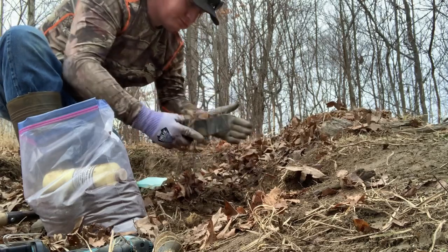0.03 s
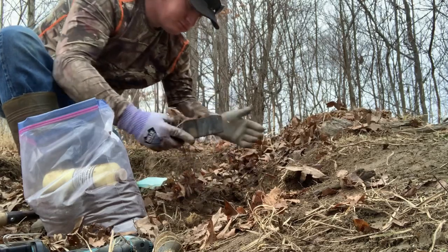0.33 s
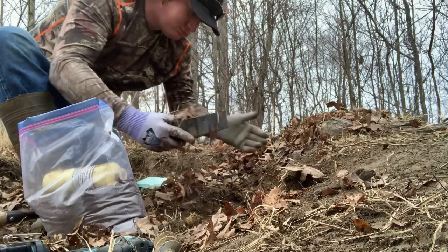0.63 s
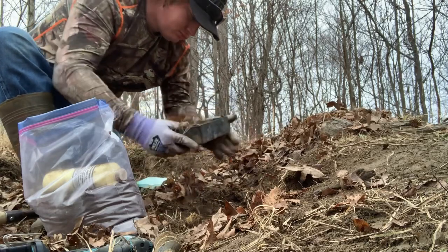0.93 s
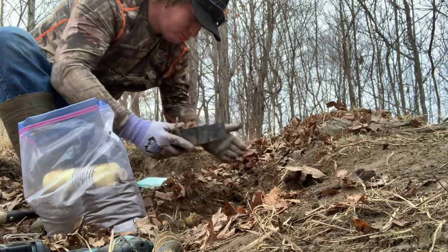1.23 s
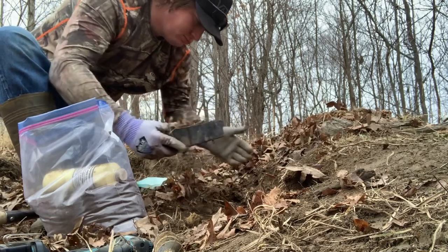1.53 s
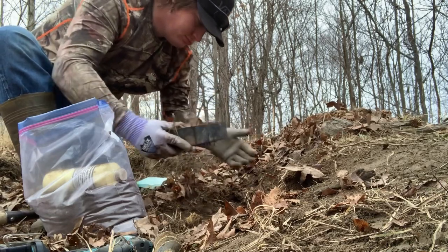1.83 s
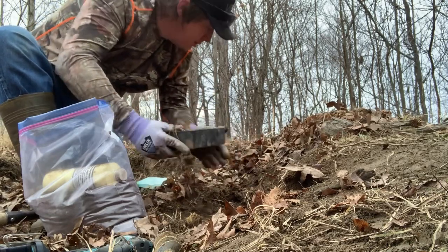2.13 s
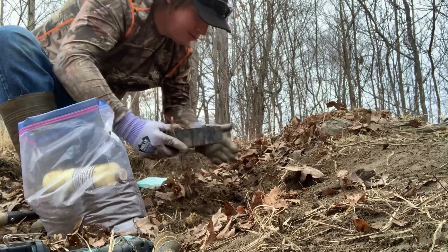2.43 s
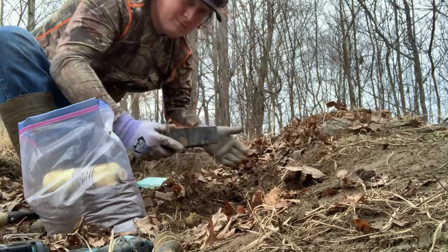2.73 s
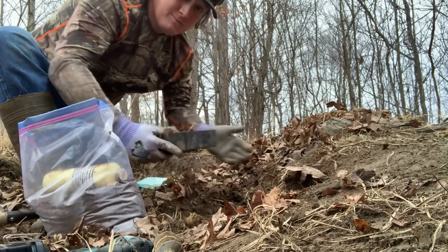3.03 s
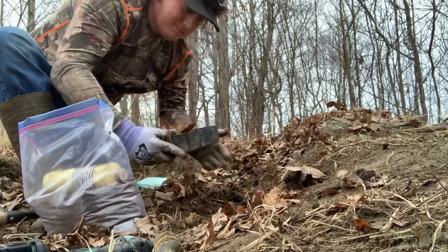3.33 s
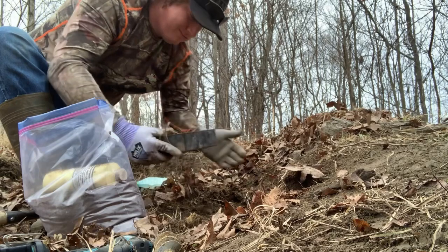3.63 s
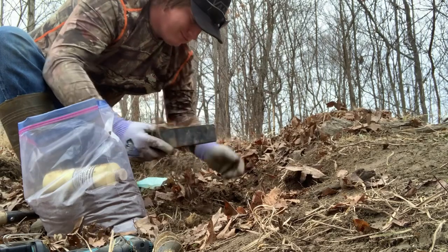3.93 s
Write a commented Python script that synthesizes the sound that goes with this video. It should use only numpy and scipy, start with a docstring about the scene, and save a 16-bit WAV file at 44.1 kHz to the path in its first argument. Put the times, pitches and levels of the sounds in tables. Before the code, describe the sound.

Dry, steady knife taps on a hand-held dirt clod, over a faint distant engine.

```python
"""A digging knife knocks on a hand-held clod about four times a second; a gloved person kneels in a wood.
Each knock: a dry crack, a second contact a few ms later, a dull handle knock and a sinking thud;
the blade sometimes rings on. Sleeves swish with every stroke, gloves scuff, crumbs drop on leaves.
An engine drones far away under faint wind."""
import sys
import numpy as np
from scipy import signal
from scipy.fft import rfft, irfft
from scipy.io import wavfile

SR = 44100
rng = np.random.default_rng(int(sys.argv[2]) if len(sys.argv) > 2 else 0)


def waveform_to_disk(signal):
    """Save audio, clipped to [-1, 1], as 16-bit WAV at the path in sys.argv[1]."""
    frames = np.transpose(np.atleast_2d(signal))
    scaled = np.clip(frames, -1, 1) * 32767
    samples = np.round(scaled).astype(np.int16)
    wavfile.write(sys.argv[1], SR, samples)


N = 176400
TIME_S = np.arange(N) / SR
HIT_S = TIME_S[:N // 16]

# Knife blows: (time [s], crack [dB], crack pitch [Hz], low-mid re crack [dB], top re crack [dB],
# second contact delay [s], second contact [dB], handle [dB], thud [dB], ring [dB], sleeve [dB])
BLOWS = [(0.1633, -24.5, 3030, -4.5, -2.5, 0.012, -40, -30.5, -24.5, -52.5, -52.5),
         (0.4155, -22, 2970, 1, -2, 0.0042, -28, -34, -25, -36.5, -49),
         (0.6683, -25, 2840, -3.5, -5, 0.0035, -25.5, -34.5, -23, -42, -48),
         (0.9018, -27.5, 3150, 1.5, -1, 0.0035, -24.5, -32.5, -24.5, -47, -50),
         (1.125, -23.5, 3170, -4.5, -4, 0.0047, -29, -35, -22.5, -45, -51),
         (1.3779, -23, 3120, -5, -7.5, 0.0042, -24, -30.5, -22, -42.5, -48.5),
         (1.6299, -22, 2760, -3, -10, 0.0033, -20.5, -32.5, -23.5, -36.5, -47.5),
         (1.8645, -22, 3640, -6, -9.5, 0.0047, -23, -33.5, -24.5, -51.5, -49.5),
         (2.0994, -31, 3180, -3.5, -7.5, 0.0036, -34.5, -39.5, -30.5, -55, -52),
         (2.3298, -22.5, 3380, -5, -5, 0.0045, -24, -25.5, -24, -56, -51.5),
         (2.56, -21.5, 3460, -6, -3.5, 0.0033, -20, -28.5, -19, -47.5, -49),
         (2.7823, -22, 3150, -6, -5.5, 0.0037, -23, -27, -23.5, -49.5, -51.5),
         (3.0183, -22, 3370, -3, -2.5, 0.0033, -21.5, -36, -24, -49.5, -50),
         (3.2522, -23.5, 3440, -8.5, -4, 0.0035, -22, -29, -19, -39.5, -49),
         (3.4703, -16.5, 3115, -10.5, -7.5, 0.0039, -21.5, -26, -23, -47, -51),
         (3.7056, -25, 3410, -14, -2, 0.0036, -20, -32, -21.5, -44.5, -51.5)]


def from_db(db):
    """Decibels to gain."""
    return 10 ** (np.asarray(db) / 20)


def add(out, start_s, sound):
    """Mix a sound into out."""
    i = max(int(start_s * SR), 0)
    out[i:i + len(sound)] += sound[:max(N - i, 0)]


def drift(rate_hz):
    """Interpolated random values, spread about 1."""
    return np.interp(TIME_S * rate_hz, np.arange(N), rng.standard_normal(N))


def coloured_noise(spectrum):
    """Unit-rms noise shaped by (frequency [Hz], density [dB])."""
    hz, db = np.transpose(spectrum)
    bins_hz = np.maximum(np.fft.rfftfreq(N, 1 / SR), 1)
    gain = from_db(np.interp(np.log(bins_hz), np.log(hz), db))
    noise = irfft(rfft(rng.standard_normal(N)) * gain, N)
    return noise / np.sqrt(np.mean(noise ** 2) + 1e-20)


def resonate(x, modes):
    """Parallel damped resonances, alternating in sign."""
    out = np.zeros(len(x))
    for k, (hz, width_hz, db) in enumerate(modes):
        r = np.exp(-np.pi * width_hz / SR)
        b = np.array([1, 0, -1]) * (1 - r * r) / 2
        a = [1, -2 * r * np.cos(2 * np.pi * hz / SR), r * r]
        out += (-1) ** k * from_db(db) * signal.lfilter(b, a, x + 1e-18)
    return out


def friction(attack_s, decay_s):
    """Burst of tiny contacts that swells and dies."""
    envelope = np.minimum(HIT_S / attack_s, 1) * np.exp(-np.maximum(HIT_S - attack_s, 0) / decay_s)
    return envelope * rng.standard_normal(len(HIT_S))


def at_level(x, db):
    """Scale to the energy of 4 ms at this level."""
    return from_db(db) * x / np.sqrt(np.sum(x ** 2) / (.004 * SR) + 1e-20)


def touches(events, modes, attack_s, decay_s, gain_db):
    """One friction burst through the modes per event."""
    out = np.zeros(N)
    for start_s, db in events:
        burst = resonate(friction(attack_s, decay_s), modes)
        add(out, start_s, at_level(burst, db + gain_db))
    return out


def engine():
    """Low orders of a distant engine, wavering on the way; a second hum beats with them."""
    # Harmonics of the turning rate: (order, level [dB])
    orders = [(2, -40), (3, -50), (4, -49), (6, -53.5), (8, -55), (10, -63.5)]
    # Drone envelope: (time [s], gain [dB])
    swell = [(0, -2.5), (.5, -1.5), (1.15, -1), (1.3, 1), (1.5, -3.5), (1.7, -1), (2.0, -3), (2.15, -4.5),
             (2.38, -5.5), (2.6, -1), (3.0, -1), (3.5, -3.5), (4, -1.5)]
    # Second hum envelope: (time [s], level [dB])
    hum_levels = [(0, -48), (.5, -55), (.9, -56), (1.1, -74), (4, -65)]
    turn_hz, hum_hz, wander, flutter_db = 33.62, 78.9, .004, .9
    clock_s = np.cumsum(1 + wander * drift(5.37)) / SR
    drone = sum(from_db(db + flutter_db * drift(7.2)) * np.sin(2 * np.pi * order * turn_hz * clock_s)
                for order, db in orders)
    drone *= from_db(np.interp(TIME_S, *np.transpose(swell)))
    hum_gain = from_db(np.interp(TIME_S, *np.transpose(hum_levels)))
    hum = hum_gain * np.sin(2 * np.pi * hum_hz * clock_s)
    return np.sqrt(2) * (drone + hum)


def wind():
    """Faint low noise with slight gusts."""
    # Wind spectrum: (frequency [Hz], relative density [dB])
    spectrum = [(25, -0.5), (45, 1.5), (100, 8.5), (200, -4.5), (300, -6), (480, -7.5), (750, -17.5),
                (1000, -16.5), (1500, -28.5), (2100, -27.5), (3200, -26), (5500, -32), (7500, -29.5),
                (11000, -36.5), (15500, -44)]
    level_db, gust_db = -51.5, 2.05
    return from_db(level_db - gust_db * drift(3.95)) * coloured_noise(spectrum)


def sleeves():
    """Cloth rubs, grainy and uneven, as the arm swings down and lifts."""
    # Swing, then lift: (offset from knock [s], width [s], gain [dB])
    lobes = [(-.022, 0.037, 1.5), (0.068, 0.046, -3.5)]
    # Cloth spectrum: (frequency [Hz], relative density [dB])
    spectrum = [(300, 4.5), (500, -1.5), (750, 0), (1000, -8.5), (1400, -7), (2000, -7.5), (2700, -1.5),
                (3400, -0.5), (4500, -9), (5800, -7.5), (7000, -6.5), (9000, -11), (12000, -16.5),
                (15500, -28.5)]
    gain_db, grain_db, patch_db = -.5, 2.5, 1.5
    moves = [(knock_s + offset_s, width_s, sleeve_db + db)
             for knock_s, *_, sleeve_db in BLOWS for offset_s, width_s, db in lobes]
    moves.append((3.98, .12, -61.5))  # hands settle after the last knock
    power = sum(from_db(db) ** 2 * np.exp(-np.minimum(((TIME_S - centre_s) / width_s) ** 2, 20))
                for centre_s, width_s, db in moves)
    texture_db = grain_db * drift(1800) + patch_db * drift(60)
    return np.sqrt(power) * from_db(gain_db + texture_db) * coloured_noise(spectrum)


def crack(db, pitch_hz, low_mid_db, top_db, decay_s):
    """A click and crushed grit excite low-mid, middle and top modes, each group at its own level."""
    # Damped crack modes: (frequency [Hz], width [Hz], gain [dB])
    crack_modes = [(1210, 216, 2), (1490, 137, 5.5), (1720, 530, -2.5), (2277, 215, -2.5), (2787, 416, -1),
                   (3307, 566, 6), (3750, 950, 0), (5170, 1500, -9), (7150, 1600, 13.5), (7760, 470, -22.5),
                   (8410, 1980, -4), (11200, 600, -17), (12400, 1000, -15)]
    attack_s, tail_db, tail_decay_s = .00081, -19.5, .0098
    click_s, click_db, contact_hz = .0007, 9.5, 10600
    force = friction(attack_s, decay_s) + from_db(tail_db) * friction(attack_s, tail_decay_s)
    force[int(click_s * SR)] += from_db(click_db)
    force = signal.sosfilt(signal.butter(2, contact_hz, fs=SR, output="sos"), force)  # soft contact
    modes = crack_modes + [(pitch_hz, 286, 3)]  # pitch depends on where the blade lands
    groups = np.digitize([hz for hz, *_ in modes], [2200, 6000])
    out = np.zeros(len(HIT_S))
    for k, group_db in enumerate((low_mid_db, 0, top_db)):
        members = [mode for mode, group in zip(modes, groups) if group == k]
        out += (-1) ** k * at_level(resonate(force, members), db + group_db)
    return out


def thud(db):
    """The clod is pushed into the palm: a few cycles, sinking in pitch."""
    start_hz, end_hz, sink_s, peak_s = 815, 143.5, .00369, .0068
    hz = end_hz + (start_hz - end_hz) * np.exp(-HIT_S / sink_s)
    age = HIT_S / peak_s
    envelope = (age * np.exp(1 - age)) ** 2.2
    return from_db(db) * envelope * np.sin(2 * np.pi * np.cumsum(hz) / SR)


def blade(db):
    """Lowest bending mode, split into a beating pair, damped by the grip."""
    mode_hz, split_hz, partner_db, t60_s = 429.5, 25.2, -13, .16
    mode = np.sin(2 * np.pi * mode_hz * HIT_S)
    partner = from_db(partner_db) * np.sin(2 * np.pi * (mode_hz + split_hz) * HIT_S)
    return from_db(db - 60 * HIT_S / t60_s) * (mode + partner)


def handle(db):
    """The blow sets the gripped handle knocking."""
    # Dull handle modes: (frequency [Hz], width [Hz], gain [dB])
    modes = [(309.5, 67, -3), (491.6, 84, 4), (659, 70, 2), (786, 158, -6.5)]
    return at_level(resonate(signal.unit_impulse(len(HIT_S)), modes), db)


def knocks():
    """Knife on clod: crack, second contact, handle knock, thud and ring per blow."""
    crack_lead_s, handle_lag_s = .00053, .00181
    out = np.zeros(N)
    for (time_s, crack_db, pitch_hz, low_mid_db, top_db,
         delay_s, second_db, handle_db, thud_db, ring_db, _) in BLOWS:
        first = crack(crack_db - 2, pitch_hz, low_mid_db, top_db, decay_s=.0011)
        second = crack(second_db - 6, pitch_hz, low_mid_db=-9, top_db=-10, decay_s=.0018)
        add(out, time_s - crack_lead_s, first)
        add(out, time_s + delay_s - crack_lead_s, second)
        add(out, time_s + handle_lag_s, handle(handle_db + 3))
        add(out, time_s, thud(thud_db + 2.5) + blade(ring_db + 13.5))
    return out


def glove_scuffs():
    """Gloves scuff on clod and handle."""
    # Scuffs: (time [s], level [dB])
    events = [(.19, -35), (.211, -37), (.352, -41), (.465, -40), (.574, -34.5), (.627, -36), (.648, -34),
              (.7, -34), (.713, -38), (.84, -45.5), (.935, -37), (.96, -46), (1.043, -42.5), (1.097, -44),
              (1.158, -38), (1.28, -42), (1.312, -42.5), (1.425, -41.5), (1.503, -47.5), (1.538, -41.5),
              (1.728, -41), (2.262, -52), (2.29, -47), (2.519, -43), (2.625, -38.5), (2.838, -42.5),
              (3.2, -50), (3.657, -44), (3.935, -49.5), (3.982, -49)]
    # Scuff resonances: (frequency [Hz], width [Hz], gain [dB])
    modes = [(423, 71, -0.5), (550, 83, -3), (720, 190, -14.5), (1440, 170, -43)]
    return touches(events, modes, attack_s=.0025, decay_s=.006, gain_db=.5)


def glove_rubs():
    """The glove shifts on the handle with a dry rub."""
    # Grip shifts: (time [s], level [dB])
    events = [(.213, -48.5), (2.522, -46), (3.195, -50.5), (3.659, -39.5)]
    # Rub resonances: (frequency [Hz], width [Hz], gain [dB])
    modes = [(720, 300, -1), (1300, 400, 0), (1800, 500, -2), (3200, 1200, -12)]
    return touches(events, modes, attack_s=.0016, decay_s=.0063, gain_db=-.5)


def crumbs():
    """Soil crumbs land on leaves."""
    # Landings: (time [s], level [dB])
    events = [(.303, -54), (.578, -62), (.736, -47), (1.188, -49), (1.577, -36.5), (1.729, -49.5),
              (1.805, -56), (2.043, -59), (2.647, -51), (2.742, -58), (3.642, -53), (3.762, -52),
              (3.792, -51)]
    # Landing resonances: (frequency [Hz], width [Hz], gain [dB])
    modes = [(1500, 700, -12), (3440, 1400, -0.5), (7500, 3300, -3), (12400, 1600, -17)]
    return touches(events, modes, attack_s=.003, decay_s=.005, gain_db=-1)


def scene():
    """Close handwork in a quiet wood, mono."""
    handling = glove_scuffs() + glove_rubs() + crumbs()
    return (handling + wind() + knocks() + sleeves() + engine())[None]


def record(dry):
    """Microphone with two narrow dips and a steep treble cut."""
    # Response dips: (frequency [Hz], width [Hz], depth [dB])
    dips = [(1000, 180, -7), (5850, 400, -8)]
    cutoff_hz = 16000
    for hz, width_hz, depth_db in dips:
        dry = dry - (1 - from_db(depth_db)) * resonate(dry[0], [(hz, width_hz, 0)])
    return signal.sosfilt(signal.ellip(10, .1, 80, cutoff_hz, fs=SR, output="sos"), dry)


dry = scene()
out = record(dry)
waveform_to_disk(out)
```